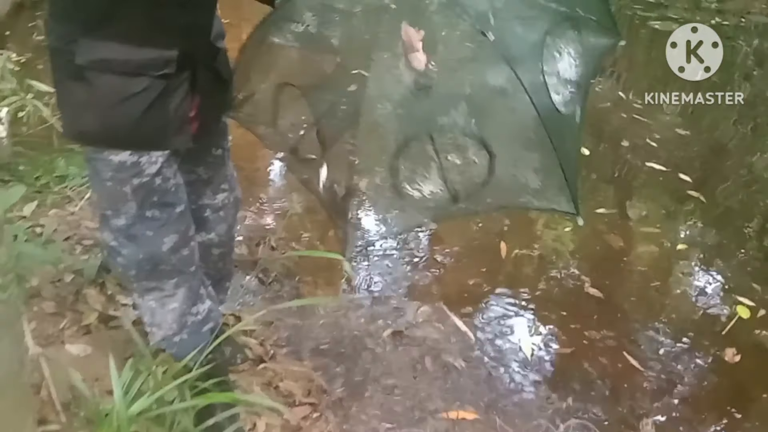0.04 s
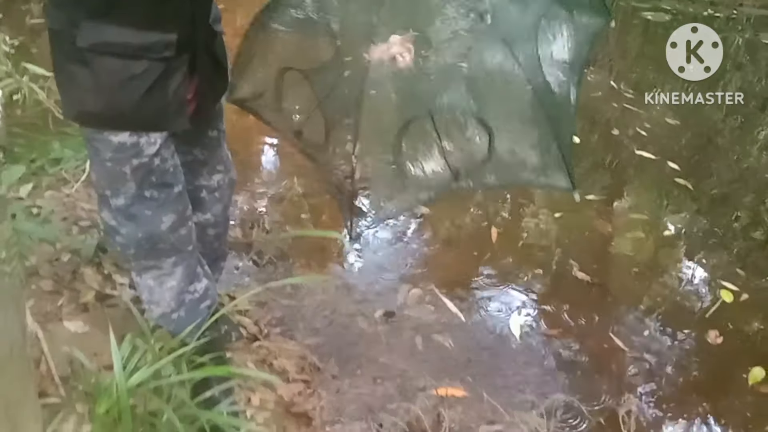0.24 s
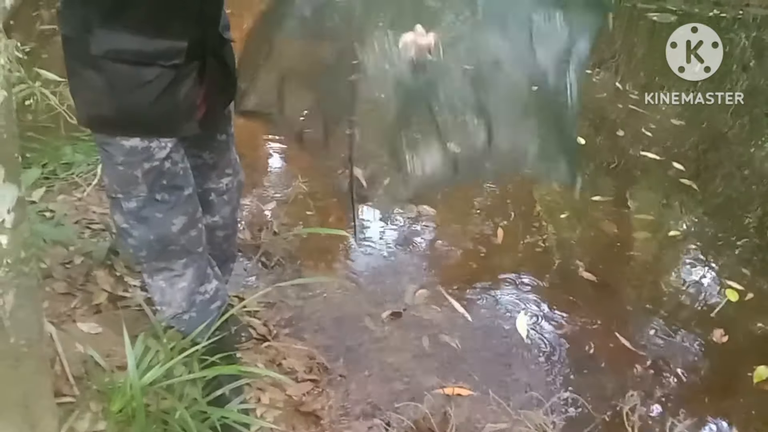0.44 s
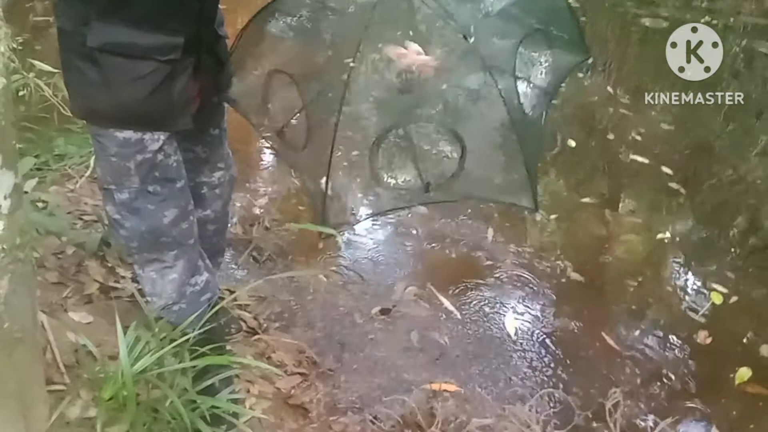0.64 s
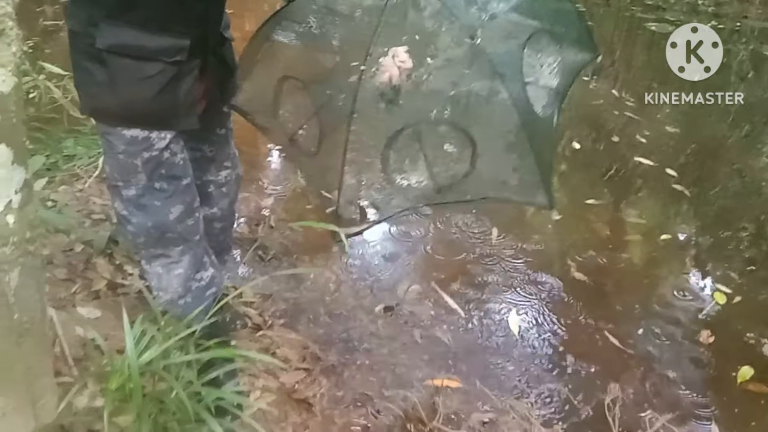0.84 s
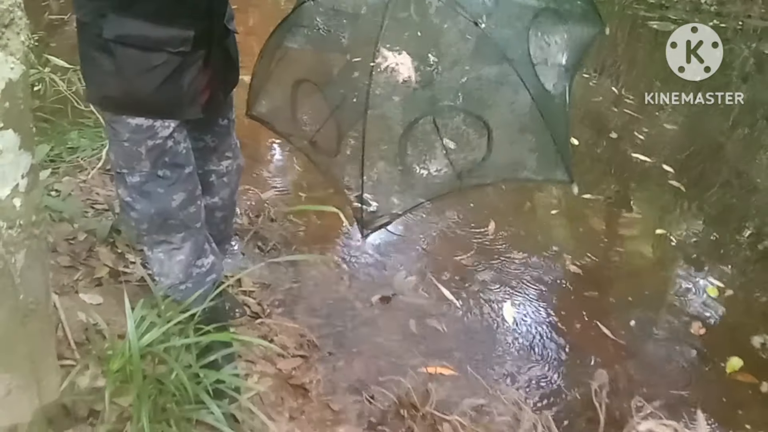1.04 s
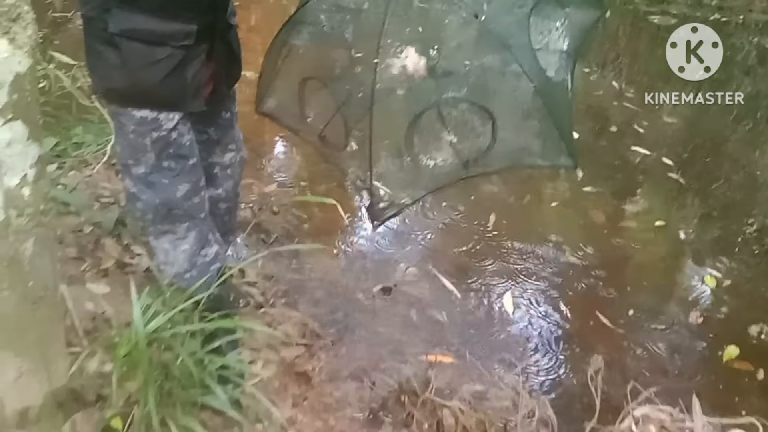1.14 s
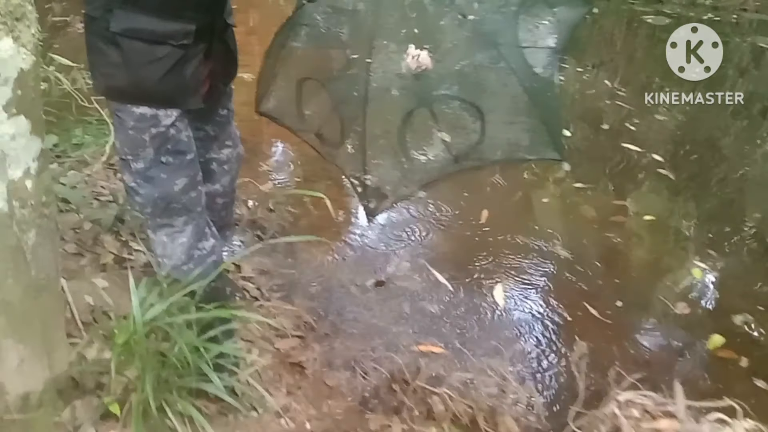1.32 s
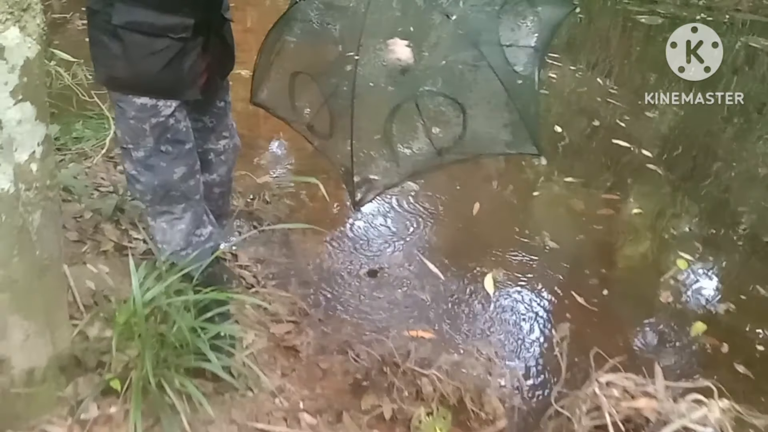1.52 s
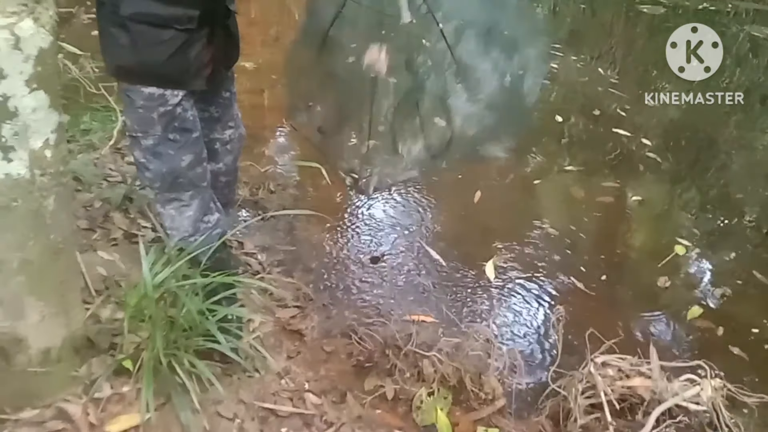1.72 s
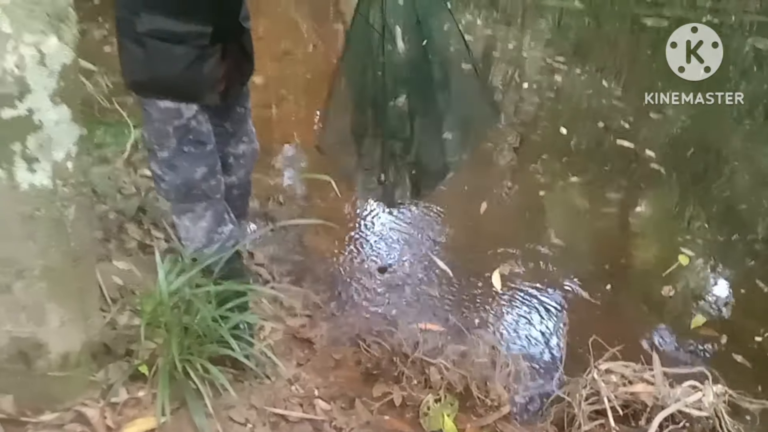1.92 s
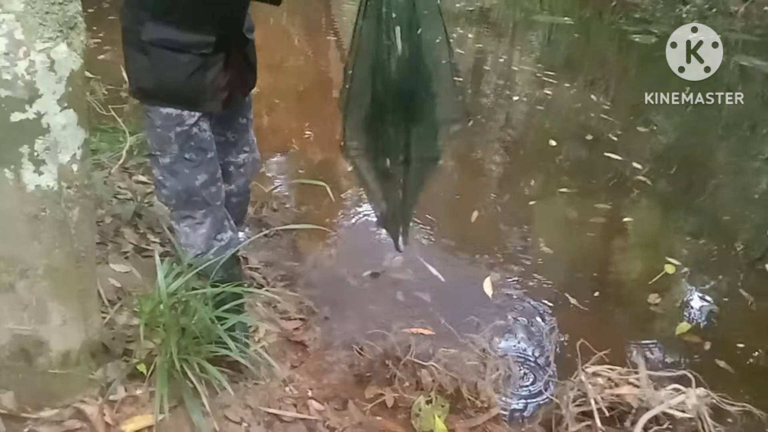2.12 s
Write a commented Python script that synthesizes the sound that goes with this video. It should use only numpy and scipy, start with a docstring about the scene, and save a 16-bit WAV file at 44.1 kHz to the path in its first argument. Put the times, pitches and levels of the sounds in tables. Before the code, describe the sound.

Wet mesh trap shaken and folded above a shallow pool, crackling spray and dripping drops, close up

```python
"""A wet mesh trap is lifted over a shallow forest pool and folded shut, close to a small camera's microphone.
The mesh is three layers of noise and tiny ringing grains: spray, rustle and slosh, swelling in bursts.
Single drops ring and splat, the ribs knock as damped sines, and bank and water give a short diffuse answer.
Narrow noise swells softly, and a faint steady hiss lies under it all.
The microphone port colours the splats: a peak near 2.5 kHz, a dip above, a broad bright hump."""
import sys
import numpy as np
from scipy import signal
from scipy.fft import rfft, irfft
from scipy.io import wavfile
from scipy.ndimage import uniform_filter1d, map_coordinates

SR = 44100
rng = np.random.default_rng(int(sys.argv[2]) if len(sys.argv) > 2 else 0)


def master(y):
    """Save y as 16-bit WAV."""
    cut = np.clip(np.atleast_2d(y).T, -1, 1)
    pcm = np.round(cut * 32767)  # scale
    wavfile.write(sys.argv[1], SR, pcm.astype(np.int16))


N = 94815  # length in samples


def amp(db):
    """Amplitude factor of a level in dB."""
    return 10 ** (np.asarray(db) / 20)


def unit(x):
    """x scaled to an rms of 1."""
    return x / np.sqrt(np.mean(x ** 2) + 1e-20)


def coloured(x, points):
    """x through a causal minimum-phase filter whose gain follows the (f/Hz, level/dB) points."""
    f, level = np.transpose(sorted(points))
    hz = np.fft.rfftfreq(8192, 1 / SR)
    gain_db = np.interp(np.log(hz + 1), np.log(f + 1), np.maximum(level, -100))
    # folding the cepstrum onto positive times makes the filter causal
    cepstrum = irfft(np.log(amp(gain_db)))
    cepstrum[1:4096] *= 2
    cepstrum[4097:] = 0
    impulse = irfft(np.exp(rfft(cepstrum)))
    return signal.fftconvolve(x, impulse)[:N]


def wobble(rate):
    """A smooth random curve through normal knots, rate knots a second."""
    knots = rng.standard_normal(int(N * rate / SR) + 4)
    return map_coordinates(knots, [np.arange(N) * rate / SR])


def rings(s, db, hz, t60, rise, attack_s, size):
    """Damped sines, one per row; the pitch climbs by the share 2 * rise within t60."""
    t = np.arange(size) / SR
    s, db, hz, t60 = (np.asarray(a)[:, None] for a in (s, db, hz, t60))
    decay = amp(db - 60 * t / t60)
    attack = (1 - np.exp(-t / attack_s)) ** 2
    wave = decay * attack * np.sin(2 * np.pi * hz * t * (1 + rise * t / t60))
    at = np.round(s * SR).astype(int) + np.arange(size)
    return np.bincount(at.ravel(), wave.ravel(), N + SR)[:N]


PATCHY_DB = 2  # spread of the patch gains


def patchy():
    """Noise with patches of random gain in time and frequency."""
    z = signal.stft(rng.standard_normal(N), nperseg=256)[2]
    field = uniform_filter1d(rng.standard_normal(z.shape), size=4, axis=0)  # over frequency
    field = uniform_filter1d(field, size=7, axis=1)  # over time
    return signal.istft(z * amp(PATCHY_DB * unit(field)), nperseg=256)[1][:N]


GRAINS_PER_S, SIZE_SPREAD_DB = 1900, 4.3
RISE = 0.058  # half the share by which grains and drops climb in pitch within their t60


def fizz(spectrum, centre_hz, cycles, grain_db, flutter_db):
    """Tiny bursting grains, each ringing a set number of cycles, over fluttering noise; rms 1."""
    count = int(GRAINS_PER_S * N / SR)
    s = rng.random(count) * N / SR
    db = -SIZE_SPREAD_DB * np.log(rng.random(count) + .01)  # few grains are loud
    hz = np.clip(centre_hz * np.exp(0.399 * rng.standard_normal(count)), 100, 15000)
    grains = rings(s, db, hz, cycles / hz, RISE, attack_s=.00012, size=600)
    noise = patchy() * amp(flutter_db * wobble(140))
    return unit(unit(coloured(noise, spectrum)) + amp(grain_db) * unit(coloured(grains, spectrum)))


# Course of the shaken mesh: t/s, spray level/dB, middle rustle level/dB, low slosh level/dB
MESH_LEVELS = [(0, -55.5, -66, -73.5), (.12, -54, -66, -72), (0.187, -57, -71, -84),
               (0.201, -41, -48.5, -59), (0.223, -45, -52, -57), (.26, -45.5, -59, -59),
               (0.303, -55.5, -67, -72), (0.33, -42.5, -44, -48), (.36, -40.5, -46.5, -59.5),
               (.4, -46, -48, -53), (.465, -37, -44, -51.5), (0.482, -46, -43.5, -48),
               (0.518, -37.5, -43.5, -51.5), (0.566, -46, -47.5, -56.5), (0.662, -38.5, -40.5, -57),
               (0.693, -34, -33.5, -53.5), (0.733, -33, -42.5, -56), (0.762, -31.5, -34.5, -47),
               (0.793, -32.5, -45, -55), (.83, -31.5, -47, -48), (0.867, -37.5, -45.5, -53),
               (.915, -45.5, -54, -66.5), (0.932, -40.5, -59, -66), (0.958, -51, -59, -74),
               (1.004, -33.5, -49, -65), (1.043, -37, -52.5, -54), (1.094, -50.5, -68, -77),
               (1.2, -53, -68.5, -78.5), (1.439, -60, -70.5, -80.5), (1.47, -48.5, -56.5, -70.5),
               (1.521, -58, -66, -77.5), (1.618, -50, -65.5, -69), (1.623, -36, -56, -56.5),
               (1.66, -54, -66.5, -72), (1.76, -41, -55, -65), (1.783, -49, -45, -71),
               (1.788, -34.5, -35.5, -59.5), (1.81, -36, -45, -57), (1.829, -30.5, -36.5, -65.5),
               (1.847, -41.5, -51.5, -61), (1.854, -35.5, -52, -71), (1.883, -51.5, -66, -90),
               (2.05, -60.5, -70.5, -78), (2.15, -57.5, -76, -78)]
# Colours of the three layers: f/Hz, level/dB (per Hz)
SPRAY_COLOUR = [(1940, -60), (3300, -17), (3840, -3.5), (4960, -1), (6490, 4.5), (7250, -2), (7990, -5),
                (8800, -20.5), (9250, -15), (10200, -38.5), (11550, -38.5), (12200, -63), (13000, -61),
                (13700, -61), (16000, -48)]
RUSTLE_COLOUR = [(1000, -40), (1700, -13), (2540, 1), (2950, -6.5), (3350, -10.5), (7480, -58.5)]
SLOSH_COLOUR = [(150, -50.5), (250, -10.5), (468, -18.5), (808, -2), (1800, 0.5), (2340, -30), (3960, -120)]
SURGE_DB, SURGES_PER_S = 1.2, 95  # small surges that all three layers share


def mesh():
    """The shaken wet mesh: spray, rustle and slosh, each fizzing in its own band."""
    s, *levels = np.transpose(MESH_LEVELS)
    spray, rustle, slosh = (amp(np.interp(np.arange(N) / SR, s, db)) for db in levels)
    surge = unit(amp(SURGE_DB * wobble(SURGES_PER_S)))
    return surge * (
        spray * fizz(SPRAY_COLOUR, centre_hz=5800, cycles=6.9, grain_db=-5, flutter_db=1.0)
        + rustle * fizz(RUSTLE_COLOUR, centre_hz=2626, cycles=27, grain_db=-4, flutter_db=0.5)
        + slosh * fizz(SLOSH_COLOUR, centre_hz=958, cycles=23, grain_db=3.5, flutter_db=-4.4))


# Colour of the faint background: f/Hz, level/dB (per Hz)
HISS_COLOUR = [(25, -13), (43, -3), (106, -2.5), (285, -9.5), (587, -8), (716, -17.5), (1590, -18),
               (2300, -11), (3430, -29.5), (3980, -14.5), (6220, -4.5), (7400, -4.5), (9490, -28),
               (12300, -35), (16000, -65)]
HISS_DB = -66


def hiss():
    """Faint steady noise under everything, drifting slightly in level."""
    level = amp(HISS_DB + 1.4 * wobble(6.14))
    return level * unit(coloured(rng.standard_normal(N), HISS_COLOUR))


# Response of the microphone port: f/Hz, level/dB
PORT_RESPONSE = [(1000, -23.5), (2500, -2), (3300, -5), (4000, 7), (6500, -2), (8000, 0.5), (10200, -20),
                 (11500, -27.5), (16000, -61)]
SPLAT_ATTACK_S = 0.00076


def splats(s, db, t60, size=1500):
    """Short decaying noise bursts, coloured by the microphone port."""
    out, t = np.zeros(N + size), np.arange(size) / SR
    attack = 1 - np.exp(-t / SPLAT_ATTACK_S)
    for when, level, noise in zip(s, db, rng.standard_normal((len(s), size))):
        out[round(when * SR):][:size] += amp(level - 60 * t / t60) * attack * noise
    return coloured(out[:N], PORT_RESPONSE)


# Single drops: t/s, ring level/dB (before its attack), ring f/Hz, splat level over the ring/dB
DROP_HITS = [(0.0457, -37, 7800, -27), (0.0836, -26.5, 5070, -13.5), (0.1034, -26, 4220, -12),
             (0.186, -25, 6450, -9), (0.2505, -28.5, 2790, -1.5), (0.2744, -27, 4430, -10),
             (0.31, -19.5, 4170, -20), (0.3409, -16.5, 6590, -7), (0.4159, -21.5, 4620, 1.5),
             (0.4626, -21.5, 2400, -4), (0.6882, -14.5, 5900, -6), (0.7002, -15.5, 5720, -5),
             (0.717, -18, 5200, -6), (0.8783, -20, 2130, -16), (0.9225, -17, 6340, -23),
             (.9945, -29, 6600, 0.5), (1.0245, -10.5, 6570, -11), (1.027, -15.5, 5330, -32),
             (1.2332, -31, 6150, -2.5), (1.355, -32.5, 7030, -8), (1.4912, -32.5, 2480, -25),
             (1.6196, -16.5, 6240, -14), (1.656, -28.5, 2420, -6), (1.765, -19, 5800, -6),
             (1.7672, -12.5, 5660, -8.5), (1.773, -11.5, 6600, -22), (1.7834, -8, 6160, -1.5),
             (1.826, -16.5, 6170, -1), (1.8521, -12, 4270, -9), (1.8555, -15, 6790, -22),
             (1.896, -27, 4150, -16), (1.9271, -28, 4370, -7), (1.9398, -34, 4170, -18),
             (1.9714, -29.5, 4330, -10), (1.9943, -25, 6360, -5), (2.0619, -26.5, 6200, -10),
             (2.0706, -26, 5830, -7), (2.0835, -35, 2670, 1.5), (2.1061, -29, 6550, -4)]
DROP_T60_S, SPLAT_T60_S = 0.0066, 0.0091


def drops():
    """Each drop is a short bubble ring of climbing pitch with a noisy splat."""
    s, db, hz, splat_db = np.transpose(DROP_HITS)
    bubbles = rings(s, db, hz, np.full(len(s), DROP_T60_S), RISE, attack_s=0.00055, size=3000)
    return bubbles + splats(s, db + splat_db, SPLAT_T60_S)


BANKS_DB, BANKS_T60_S = -7, 0.048


def banks(x):
    """Short diffuse answer of bank and water surface, 90 samples late: x through decaying noise."""
    tail = rng.standard_normal(8000) * amp(-60 * np.arange(8000) / SR / BANKS_T60_S)
    return signal.fftconvolve(np.pad(x, (90, 0)), tail / np.linalg.norm(tail))[:N]


# Knocks of the trap's ribs: t/s, level/dB (before the attack), f/Hz, t60/s
RIB_KNOCKS = [(.095, -57.5, 793, 0.079), (.198, -38, 960, 0.029), (0.21, -28.5, 860, 0.01),
              (.327, -39, 836, 0.044), (0.4526, -25, 1060, 0.014), (0.5161, -26, 907, 0.01),
              (.7662, -4, 1130, 0.0028), (0.7663, -29, 350, 0.011), (1.027, -25, 2270, 0.0093),
              (1.0425, -27, 2130, 0.0051), (1.235, -61.5, 11500, 0.053), (1.491, -20.5, 1400, 0.0014),
              (1.6197, -23, 4010, 0.0099), (1.7843, -18, 1810, 0.009), (1.784, -16.5, 3740, 0.0066),
              (1.995, -49.5, 1816, 0.025)]


def knocks():
    """Short knocks of the ribs: damped sines of fixed pitch."""
    s, db, hz, t60 = np.transpose(RIB_KNOCKS)
    return rings(s, db, hz, t60, rise=0, attack_s=0.00024, size=3000)


# Soft swells of narrow noise: middle t/s, length/s, level/dB, f/Hz (at the middle), glide/(Hz per s)
SWELLS = [(0.235, 0.063, -56, 1790, 7000), (0.284, 0.084, -55.5, 2280, -7000),
          (.58, 0.091, -59.5, 150, 600), (0.926, 0.13, -67.5, 426, 0), (1.228, 0.031, -62.5, 93, 0),
          (1.492, 0.053, -61.5, 121.6, 0), (1.654, 0.023, -53, 2200, 4998), (1.706, 0.23, -58, 2706, 5011),
          (1.716, 0.038, -66.5, 1094, 0), (1.734, 0.071, -63, 513, 3000), (1.95, 0.1, -56.5, 4210, 0),
          (2.037, 0.03, -57, 2600, -1)]
SWELL_WIDTH_HZ, SWELL_WIDTH_SHARE = 53, 0.051  # fixed part, and share of the pitch


def swells():
    """Each swell is a gliding band of noise, slow noise on a carrier, under a smooth arch."""
    out, t, f = np.zeros(N), np.arange(N) / SR, np.fft.rfftfreq(N, 1 / SR)
    for middle, length, db, hz, glide in SWELLS:
        since = t - middle
        slow = np.exp(-.5 * (f / (SWELL_WIDTH_HZ + SWELL_WIDTH_SHARE * hz)) ** 2)
        a, b = irfft(rfft(rng.standard_normal((2, N))) * slow, N)
        phase = 2 * np.pi * (hz + .5 * glide * since) * since
        arch = np.cos(np.pi * np.clip(since / length, -.5, .5))
        out += amp(db) * arch * unit(a * np.cos(phase) + b * np.sin(phase))
    return out


HIT_LOW_HZ, HIT_TOP_HZ = 365, 12600  # band that drops and knocks fill


def scene():
    """Mesh, hits with their answer, swells and hiss, on one channel."""
    band = signal.butter(4, [HIT_LOW_HZ, HIT_TOP_HZ], "band", fs=SR, output="sos")
    hits = signal.sosfilt(band, drops() + knocks())
    answer = amp(BANKS_DB) * banks(hits)
    return (mesh() + hits + answer + swells() + hiss())[None]


LOW_CUT_HZ, TOP_HZ = 89, 15500


def record(dry):
    """A bass cut, and nothing above the band limit."""
    dry = signal.sosfilt(signal.butter(2, LOW_CUT_HZ, "high", fs=SR, output="sos"), dry)
    return irfft(rfft(dry) * (np.fft.rfftfreq(N, 1 / SR) < TOP_HZ), N)


dry = scene()
out = record(dry)
master(out)
```